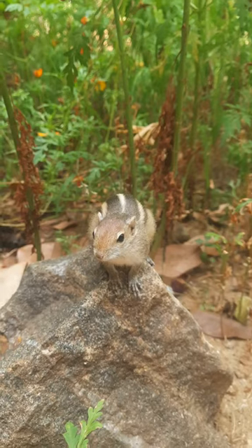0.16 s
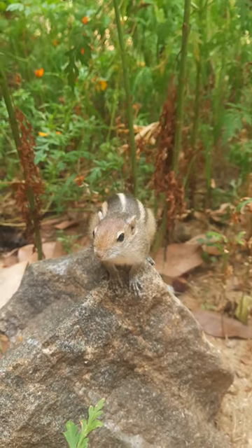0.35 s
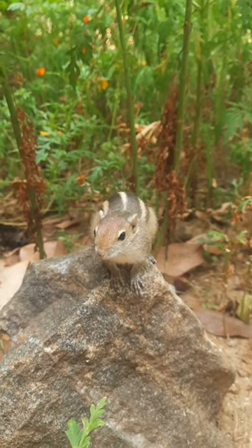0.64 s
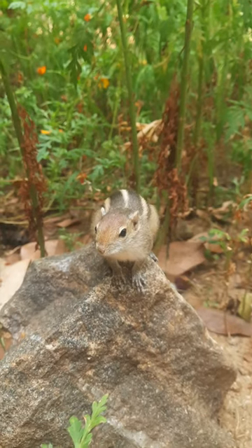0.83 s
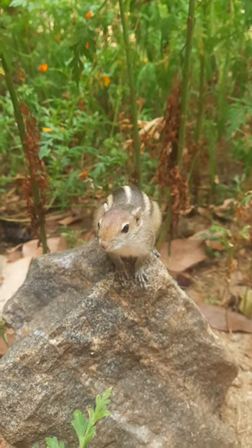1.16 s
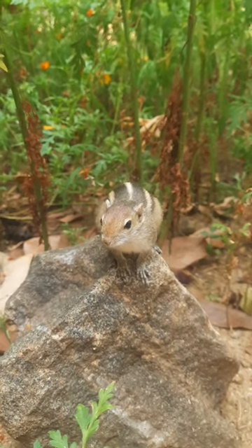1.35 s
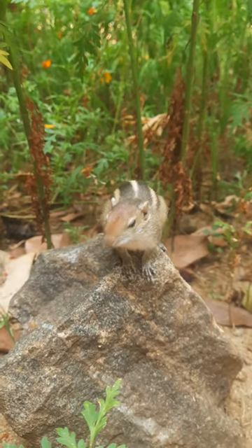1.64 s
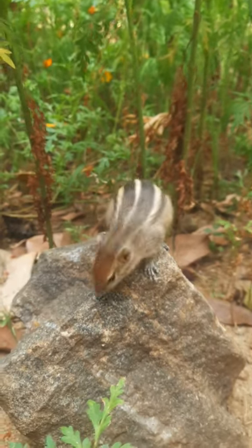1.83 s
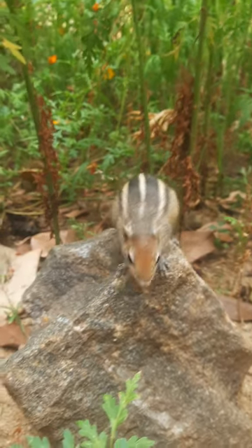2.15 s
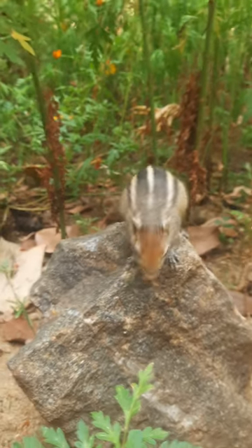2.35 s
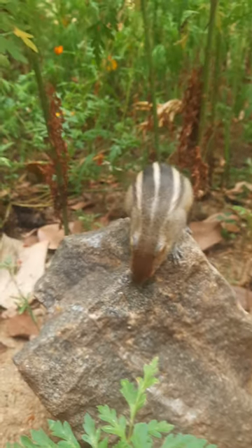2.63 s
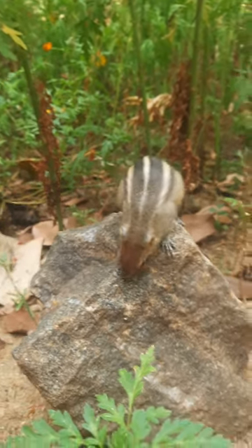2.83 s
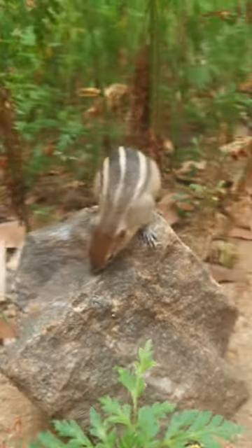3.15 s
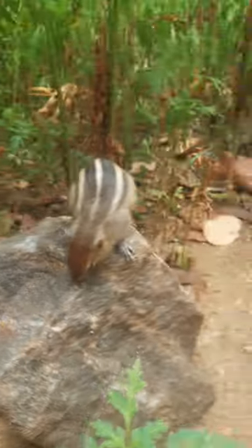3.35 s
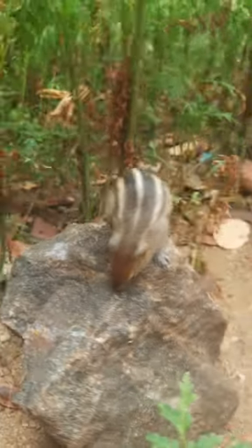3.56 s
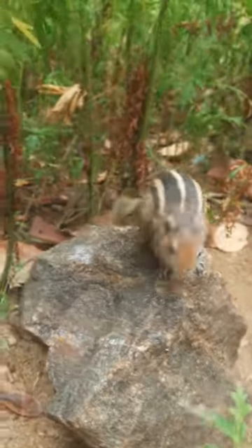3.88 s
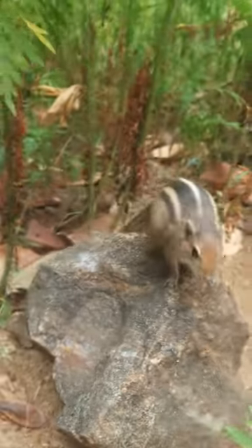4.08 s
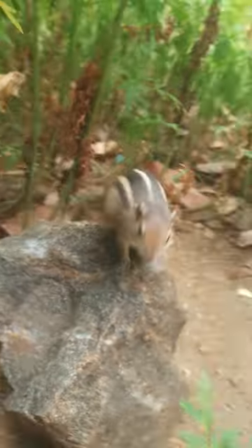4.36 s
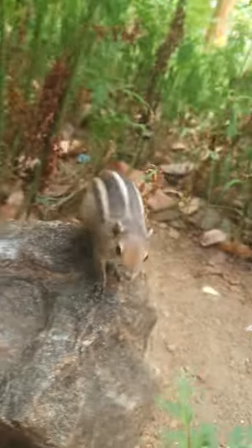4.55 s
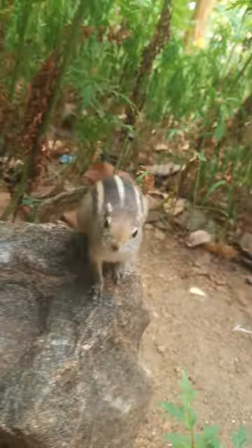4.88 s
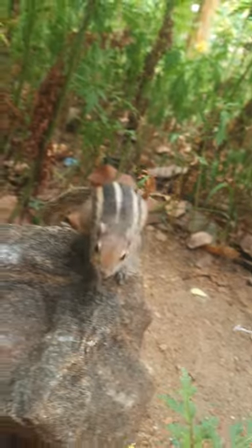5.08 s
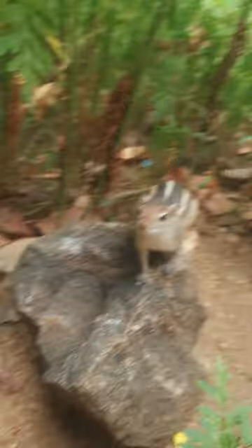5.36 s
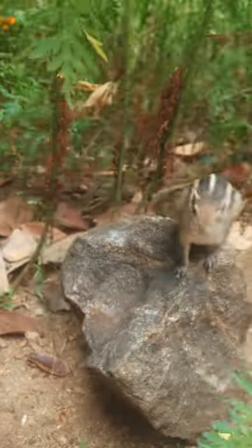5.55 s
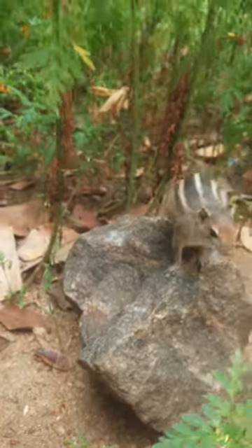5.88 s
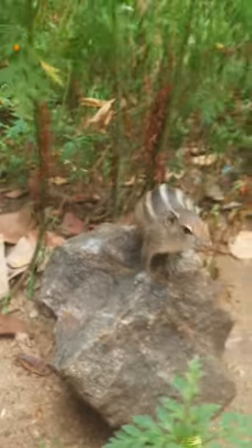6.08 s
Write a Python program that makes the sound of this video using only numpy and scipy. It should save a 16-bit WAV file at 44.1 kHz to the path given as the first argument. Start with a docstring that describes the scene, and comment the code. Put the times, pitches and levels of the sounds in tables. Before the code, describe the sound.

A small striped squirrel calls close to the microphone among weeds. Two upward-slurring whistles come first, then a thin high note and a short pip, then six sharp swooping chirps in a steady run. A brief rasp and a tiny tick follow. Behind it a distant engine drones and gathers speed, road wash swells once, and a faint bird answers from the left. A last slurred whistle ends it.

```python
"""Out among tall weeds, a distant engine rumble, road wash and air hiss fade in and slowly grow.
Close to the microphone come two slurred whistles, a thin high note and a pip, all gliding sines; a small
bird answers far off to the left. Six swooping chirps follow with fizz, then a rough rasp and a tick in hiss.
The road swells once, and a faint falling note and a last slur close the scene, the engine still gathering
speed. A small surface echoes the near calls, and the plants scatter them as decaying noise."""
import sys
import numpy as np
from scipy import signal
from scipy.fft import rfft, irfft, next_fast_len
from scipy.io import wavfile
from scipy.ndimage import uniform_filter1d

SR = 44100
rng = np.random.default_rng(int(sys.argv[2]) if len(sys.argv) > 2 else 0)


def to_wav(s):
    """Save 16-bit WAV."""
    ch = np.atleast_2d(s).T  # columns
    pcm = np.round(np.clip(ch, -1, 1) * 32767)  # PCM
    wavfile.write(sys.argv[1], SR, pcm.astype(np.int16))


N = 273861
TIME = np.arange(N) / SR
CUTOFF_HZ = 15900
# the rumble's slow rise also carries the weak engine orders
RUMBLE_DB, RUMBLE_DB_PER_S = -50.5, 1.53


def from_db(db):
    """Decibels to gain."""
    return 10 ** (np.asarray(db) / 20)


def rms_one(x):
    """Scale to unit rms."""
    return x / np.sqrt(np.mean(x ** 2) + 1e-20)


def level_in_time(rows):
    """Level in dB at every sample, from rows of time and level."""
    s, db = np.transpose(rows)
    return np.interp(TIME, s, db)


def at_hz(points, hz):
    """Read a spectrum on a log-frequency axis."""
    points_hz, points_db = np.transpose(points)
    return np.interp(np.log(np.maximum(hz, 1)), np.log(points_hz), points_db)


def drift(rate):
    """Random wander with a spread of about 1, with a new target rate times a second."""
    knots = rng.standard_normal(N // 4)
    # joining the knots by straight lines lowers the spread to sqrt(2/3)
    return np.interp(TIME * rate, np.arange(len(knots)), knots) / np.sqrt(2 / 3)


def noise(spectrum):
    """Stereo noise of a given colour, alike in both channels in the bass; rms 1."""
    # likeness of left and right: f/Hz, correlation (-1 to 1)
    likeness = [(60, 1), (150, 0.96), (300, 0.92), (600, 0.81), (1000, 0.29), (1700, 0.19), (8000, -0.093),
                (16000, -0.18)]
    size = next_fast_len(N)
    hz = np.arange(size // 2 + 1) * SR / size
    mid, side = rfft(rng.standard_normal((2, size)))
    alike = np.clip(at_hz(likeness, hz), -1, 1)
    pair = np.sqrt(1 + alike) * mid + np.sqrt(1 - alike) * side * [[1], [-1]]
    low_skirt = np.minimum(hz / spectrum[0][0], 1) ** 2
    high_skirt = 1 / np.maximum(hz / spectrum[-1][0], 1) ** 4
    colour = low_skirt * high_skirt * from_db(at_hz(spectrum, hz))
    return rms_one(irfft(pair * colour, size)[:, :N])


def pan(x, left_db):
    """Tilt the level towards the left channel."""
    return x * from_db([[left_db / 2], [-left_db / 2]])


def delayed(x, ms):
    """Delay by any fraction of a sample, as a phase slope across the spectrum."""
    size = next_fast_len(N + SR // 10)
    hz = np.arange(size // 2 + 1) * SR / size
    return irfft(rfft(x, size) * np.exp(-2j * np.pi * hz * ms / 1000), size)[:N]


def growing(start_db, db_per_s):
    """Level in dB of a background layer: a quick fade-in on a slow steady rise."""
    fade_db, fade_s = 20, 0.41
    return start_db + db_per_s * TIME - fade_db * np.exp(-TIME / fade_s)


def envelope(t, attack_s, release_s):
    """Gain that rises from 0.01, holds at 1 and falls to 0.01 at the last of the times t."""
    return np.clip(np.minimum(t / attack_s, (t[-1] - t) / release_s), .01, 1)


def add(out, contour, waver, start=0, gain_db=0, overtone_db=0):
    """Add one whistled note: a gliding sine with faint overtones that the throat lets through near 10 kHz."""
    # overtones against the fundamental, before overtone_db: f/Hz, level/dB
    overtone_levels = [(2000, -43), (4200, -39), (6500, -52), (8300, -50.5), (10300, -27.5), (12200, -38),
                       (14000, -49.5), (16000, -54)]
    s, hz, db = np.transpose(contour)
    s = start + np.maximum.accumulate(s)
    span = slice(max(int(s[0] * SR), 0), min(int(s[-1] * SR), N))
    t = TIME[span]
    # 88 samples (2 ms) round the corners of the glide
    pitch = uniform_filter1d(np.interp(t, s, hz), size=88) * (1 + waver[span])
    phase = 2 * np.pi * np.cumsum(pitch) / SR
    k = np.arange(2, 9)[:, None]
    overtone_gain = from_db(at_hz(overtone_levels, k * pitch) + overtone_db) * (k * pitch < CUTOFF_HZ)
    tone = np.sin(phase) + (overtone_gain * np.sin(k * phase)).sum(axis=0)
    release = np.clip((s[-1] - t) / .004, 0, 1)
    out[span] += from_db(gain_db) * np.interp(t, s, from_db(db)) * release * tone


def scatter(x, early_db, early_t60, late_db, late_t60):
    """Stems and leaves scatter a quick dense tail; trees further off add a faint, slow and duller one."""
    # scattering by the plants, more in the treble: f/Hz, level/dB
    scattering = [(1100, -3.5), (1700, 2), (2500, 1), (3600, 0.5), (5000, 8.5), (7000, 6.5), (10500, 4),
                  (15000, 3)]
    t, hz = TIME[:SR], np.arange(SR // 2 + 1)
    tails = 0
    for level_db, t60, top_hz in ((early_db, early_t60, 20000), (late_db, late_t60, 5500)):
        decay = from_db(-60 * t / t60) * (1 - np.exp(-t / 0.0027))
        grains = rng.standard_normal((2, SR)) * decay
        colour = from_db(level_db + at_hz(scattering, hz)) / np.sqrt(1 + (hz / top_hz) ** 4)
        tails = tails + irfft(rfft(rms_one(grains)) * colour, SR) / np.sqrt(SR)
    return signal.fftconvolve(x[None], tails, axes=1)[:, :N]


def background():
    """Three coloured noises: low rumble, the wash of a road and a thin hiss of air."""
    # colour of the rumble: f/Hz, level/dB (per Hz)
    rumble_colour = [(25, -24.5), (45, -7), (70, -9), (100, 0), (125, 3), (160, -7), (220, -7), (300, -12),
                     (420, -18.5), (700, -42)]
    # colour of the road wash: f/Hz, level/dB (per Hz)
    road_colour = [(250, -2), (450, 2), (700, 1), (1150, -0.5), (1700, -7.5), (2600, -18), (4500, -20),
                   (8000, -24.5)]
    # colour of the air hiss: f/Hz, level/dB (per Hz)
    air_colour = [(1000, 6.5), (2500, 8.5), (3300, 3), (5000, 0), (8000, 1), (9000, -9.5), (11000, -7.5),
                  (15500, -7)]
    # the road swells once, as if something drove by
    pass_at_s, pass_width_s, pass_db = 5.22, 0.45, 7
    passing_db = pass_db * np.exp(-((TIME - pass_at_s) / pass_width_s) ** 2)
    rumble_level_db = growing(RUMBLE_DB, RUMBLE_DB_PER_S) + .8 * drift(7.8)
    road_level_db = growing(-67, db_per_s=2.5) + passing_db + 1.0 * drift(14)
    rumble = from_db(rumble_level_db) * noise(rumble_colour)
    road = from_db(road_level_db) * noise(road_colour)
    air = from_db(growing(-66, db_per_s=1.96)) * noise(air_colour)
    return pan(rumble, left_db=0.1) + pan(road + air, left_db=1.2)


def engine():
    """A distant exhaust drone gathering speed: two strong harmonics of the firing rate, weak wavering orders."""
    # drone's fundamental: t/s, level/dB
    drone_low = [(0, -80), (.67, -50.5), (1.15, -47), (2.5, -53.5), (3.25, -44), (4.2, -40.5), (5.3, -40),
                 (5.8, -47), (6.21, -47)]
    # drone's second harmonic, before a 3 dB cut: t/s, level/dB
    drone_high = [(0.0, -68), (0.08, -58), (0.66, -51), (1.07, -62.5), (1.45, -44.5), (2.2, -53.5),
                  (2.97, -38.5), (3.7, -44.5), (6.21, -45)]
    # weaker orders: multiple of the firing rate, level/dB (against the rumble)
    engine_orders = [(1.5, -18), (2.5, -20.5), (3, -12), (4, -16)]
    start_hz, speed_up_hz_per_s = 62.37, 1.63
    firing_hz = start_hz + speed_up_hz_per_s * TIME
    phase = 2 * np.pi * np.cumsum(firing_hz * (1 + .004 * drift(12))) / SR
    first_db = level_in_time(drone_low) + 1.4 * drift(10)
    second_db = level_in_time(drone_high) - 3.0 + 1.2 * drift(14)
    out = from_db(first_db) * np.sin(phase)
    out += from_db(second_db) * np.sin(2 * phase + 0.35 * drift(11))
    rumble_db = growing(RUMBLE_DB, RUMBLE_DB_PER_S)
    for multiple, db in engine_orders:
        order_db = rumble_db + db + 2.84 * drift(5)
        out += from_db(order_db) * np.sin(multiple * phase + 0.82 * drift(8))
    return pan(np.sqrt(2) * out, left_db=2.14)


def far_bird():
    """Thin falling notes from the left, some quavering, with a long scattered tail."""
    # notes: start t/s, length t/s, from f/Hz, to f/Hz, level/dB (before distance), quaver (share of pitch)
    far_notes = [(.885, .12, 4960, 4590, -48.5, 0.016), (1.099, 0.091, 3940, 3540, -60.5, .015),
                 (1.174, 0.13, 4990, 4630, -52, 0.022), (1.917, .16, 5000, 4490, -63, .003),
                 (2.14, 0.035, 4240, 4060, -63, .003), (2.269, 0.091, 3780, 3690, -57.5, .003),
                 (4.576, .12, 4840, 4700, -52, 0.024), (4.86, 0.1, 5020, 4624, -51.5, 0.015)]
    out, waver = np.zeros(N), drift(500)
    share = np.linspace(0, 1, 5)
    swell_db = 14 * (np.sqrt(np.abs(np.sin(np.pi * share))) - 1)
    for start, length, from_hz, to_hz, db, quaver in far_notes:
        hz = from_hz + share * (to_hz - from_hz)
        add(out, np.transpose([share * length, hz, db + swell_db]), quaver * waver, start)
    tail = scatter(out, early_db=-16, early_t60=0.23, late_db=-13.5, late_t60=1.1)
    return pan(from_db(-6.2) * out + tail, left_db=9)


def whistles():
    """Clean gliding notes with a slight random waver: slurs, thin note, pip and falling note."""
    # slurs: start of hold t/s, start of rise t/s, pitch ratio of the hold, gain level/dB
    slurs = [(0.636, 0.804, 1.0, -2), (1.231, 1.451, 0.97, 1), (6.09, 6.303, 0.98, 0.5)]
    # a slur's hold, before ratio and gain: share of the hold (0-1), f/Hz, level/dB
    hold_contour = [(0, 2760, -52), (.08, 2630, -44), (.3, 2524, -31.5), (.68, 2490, -29),
                    (0.942, 2533, -30.5)]
    # a slur's closing rise, before gain: t/s (from its start), f/Hz, level/dB
    rise_contour = [(0, 2576, -34), (.028, 3030, -31), (.05, 3470, -31.5), (.07, 4060, -32),
                    (.082, 4300, -44), (.09, 4260, -58)]
    # thin high note that sags, then lifts and swells: t/s, f/Hz, level/dB
    thin = [(1.742, 7400, -54), (1.765, 6940, -39), (1.79, 6600, -40.5), (1.85, 6174, -48),
            (1.934, 6335, -38), (1.966, 6450, -27.5), (2.005, 6614, -28.5), (2.035, 6460, -46)]
    # pip: t/s, f/Hz, level/dB
    pip = [(2.225, 1820, -57), (2.234, 1973, -31.5), (2.248, 2036, -17.5), (2.27, 2067, -13.5),
           (2.283, 2067, -14.5), (2.29, 2015, -24.5), (2.297, 1840, -50)]
    # faint falling note: t/s, f/Hz, level/dB
    fall = [(5.56, 7836, -67), (5.596, 7545, -45), (5.681, 7384, -44.5), (5.754, 7240, -46),
            (5.77, 7270, -67)]
    out, waver = np.zeros(N), 0.0019 * drift(120)
    for hold_s, rise_s, ratio, db in slurs:
        hold = np.array(hold_contour) * [rise_s - hold_s, ratio, 1] + [hold_s, 0, 0]
        rise = np.array(rise_contour) + [rise_s, 0, 0]
        add(out, np.vstack([hold, rise]), waver, gain_db=db, overtone_db=-29)
    add(out, thin, waver, overtone_db=23)
    add(out, pip, waver / 2, overtone_db=-1.0)
    add(out, fall, waver, overtone_db=35)
    return out


def stroke(t, hz, attack_s):
    """Contour of a chirp's stroke: its loudness follows pitch as it sweeps through the throat's resonance."""
    # throat resonance, before attack and gain: f/Hz, level/dB
    throat = [(1200, -34), (1435, -26), (1700, -19.5), (2250, -12.5), (3100, -8), (3700, -11.5)]
    attack_db = 20 * np.log10(np.clip(t / attack_s, .01, 1))
    return np.transpose([t, hz, at_hz(throat, hz) + attack_db])


def scoop(bottom_ratio):
    """A U-shaped glide: steep dive, round bottom, and a climb part of the way back."""
    top_hz, bottom_hz, end_hz = 3565, 1610 * bottom_ratio, 2503
    dive_s, climb_s = .0212, .0215
    t = np.linspace(0, dive_s + climb_s, 64)
    dive = np.maximum(1 - t / dive_s, 0) ** 1.75
    climb = np.maximum((t - dive_s) / climb_s, 0) ** 1.6
    hz = bottom_hz + (top_hz - bottom_hz) * dive + (end_hz - bottom_hz) * climb
    return stroke(t, hz, attack_s=.0018)


def swoop():
    """One fast, almost straight fall that eases a little at the end."""
    top_hz, end_hz, length_s = 3747, 1195, .0265
    share = np.linspace(0, 1, 64)
    hz = end_hz + (top_hz - end_hz) * (1 - share) ** 1.12
    return stroke(share * length_s, hz, attack_s=0.0053)


def chirps():
    """Each chirp is a U-shaped scoop, a loud downward swoop and a soft low hoot; the loud strokes fizz."""
    # chirps: scoop t/s, swoop t/s, pitch ratio at the scoop's bottom, gain level/dB, brightness level/dB,
    # hoot pitch ratio, hoot gain level/dB
    chirp_rows = [(2.5208, 2.5676, 1.054, -1.9, -0.5, .97, -4),
                  (2.8552, 2.903, 1.04, -1.44, -0.5, 0.98, -1.5), (3.1629, 3.21, 0.96, -1, 0, 1.004, 1),
                  (3.4696, 3.5177, .99, -0.5, 1.5, 0.99, 0), (3.731, 3.7795, 1.0, -0.6, 2, 1, 0.5),
                  (3.9807, 4.0282, 1.02, 0, 1, 1.007, 0.5)]
    # soft hoot, before ratio and gain: t/s (from its start), f/Hz, level/dB
    hoot = [(0, 850, -66), (.008, 1062, -38.5), (0.016, 1172, -31.5), (0.025, 1195, -31), (.034, 1110, -45),
            (0.042, 925, -51)]
    # breathy fizz colour: f/Hz, level/dB (per Hz)
    fizz_colour = [(4000, -10.5), (6500, -6.5), (8300, -10), (9400, 2.5), (10300, 4.5), (11200, -25),
                   (12200, -12), (13500, -20.5), (15500, -25)]
    hoot_after_s = .0605  # from the start of the swoop
    out, waver = np.zeros(N), 0.0061 * drift(1500)
    fizz_db = np.zeros(N)
    for scoop_s, swoop_s, bottom, gain_db, bright_db, hoot_ratio, hoot_db in chirp_rows:
        hoot_contour = np.array(hoot) * [1, hoot_ratio, 1]
        add(out, scoop(bottom), waver, scoop_s, gain_db - 0.5, overtone_db=bright_db)
        add(out, swoop(), waver, swoop_s, gain_db, overtone_db=bright_db - 0.5)
        add(out, hoot_contour, waver, swoop_s + hoot_after_s, hoot_db, overtone_db=-7)
        fizz_db[TIME >= scoop_s] = bright_db
    strength = np.abs(signal.hilbert(out, next_fast_len(N)))[:N]
    # the power above 1 favours the loud strokes
    fizz = from_db(fizz_db - 31.5) * strength ** 1.37 * rms_one(noise(fizz_colour)[0])
    return out + fizz


def harsh_notes():
    """Two rough voices climb at once as the rasp, one very fast downward flick is the tick; both carry hiss."""
    # rasp voices, climbing ever faster, then holding: start f/Hz, top f/Hz, climb t/s,
    # curve (power of time), level/dB, attack t/s, overtones level/dB
    rasp_voices = [(2550, 5600, .06, 2.3, -27.5, .034, 25), (3050, 7140, .054, 1.9, -27.5, .034, 21)]
    # tick: t/s, f/Hz, level/dB
    tick = [(4.486, 8980, -47), (4.488, 6876, -26.5), (4.49, 4470, -28), (4.4916, 3400, -27.5),
            (4.494, 2800, -58)]
    # hiss colour of rasp and tick: f/Hz, level/dB (per Hz)
    harsh_colour = [(1800, -20), (2700, -16), (3600, -6), (5000, -7), (6800, 0), (7800, -8), (10800, 1.5),
                    (12200, -7.5), (14300, -10), (15200, -30)]
    rasp_start_s, rasp_s, release_s = 4.205, 0.067, .008
    roughness = .011  # share of the pitch
    out = np.zeros(N)
    t = np.linspace(0, rasp_s, 64)
    for start_hz, top_hz, climb_s, curve, db, attack_s, overtone_db in rasp_voices:
        hz = start_hz + (top_hz - start_hz) * np.minimum(t / climb_s, 1) ** curve
        swell_db = 20 * np.log10(envelope(t, attack_s, release_s))
        contour = np.transpose([t, hz, swell_db])
        add(out, contour, roughness * drift(1500), rasp_start_s, db, overtone_db)
    add(out, tick, 0.027 * drift(1500), overtone_db=5)
    hiss_swell = envelope(t, .018, release_s)
    rasp_hiss = from_db(-26.5) * np.interp(TIME, rasp_start_s + t, hiss_swell, left=0, right=0)
    tick_s, _, tick_db = np.transpose(tick)
    tick_hiss = np.interp(TIME, tick_s, from_db(tick_db - 1.5), left=0, right=0)
    return out + (rasp_hiss + tick_hiss) * rms_one(noise(harsh_colour)[0])


def garden(calls):
    """The calls reach the left microphone first, echo once off a small surface and scatter in the plants."""
    lag_ms, echo_ms = 0.036, 10
    direct = pan(np.array([calls, delayed(calls, lag_ms)]), left_db=1.5)
    # a small rough surface returns only a middle band: long waves pass round it, short ones scatter
    middle_band = signal.butter(2, [2330, 4600], "band", fs=SR, output="sos")
    returned = signal.sosfilt(middle_band, calls)
    echo_pair = np.array([delayed(returned, echo_ms), delayed(returned, echo_ms + lag_ms)])
    echo = from_db(-8) * pan(echo_pair, left_db=3.5)
    tail = scatter(calls, early_db=-9.5, early_t60=0.23, late_db=-18, late_t60=0.79)
    return direct + echo + pan(tail, left_db=1.0)


def scene():
    """Near calls in the garden over the far sounds."""
    far = background() + engine() + far_bird()
    calls = whistles() + chirps() + harsh_notes()
    return far + garden(calls)


def record(dry):
    """A steep low-pass cuts the top."""
    lowpass = signal.firwin(511, CUTOFF_HZ, fs=SR)
    return signal.fftconvolve(dry, lowpass[None], mode="same", axes=1)


dry = scene()
out = record(dry)
to_wav(out)
```